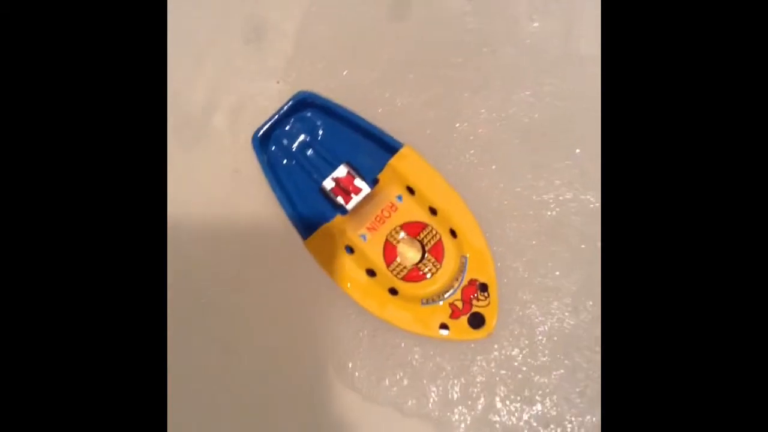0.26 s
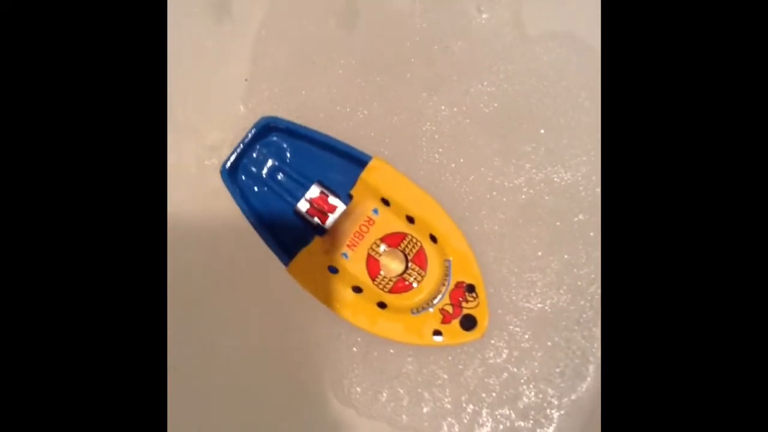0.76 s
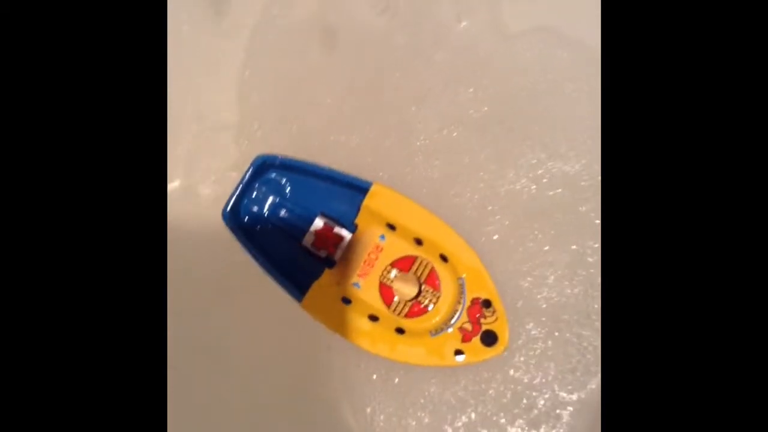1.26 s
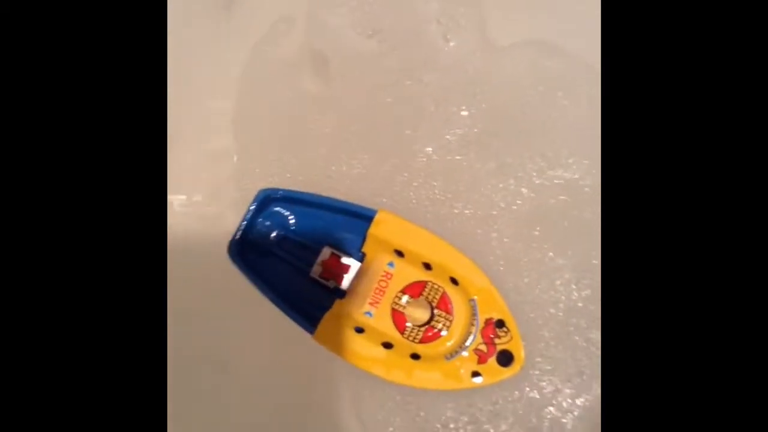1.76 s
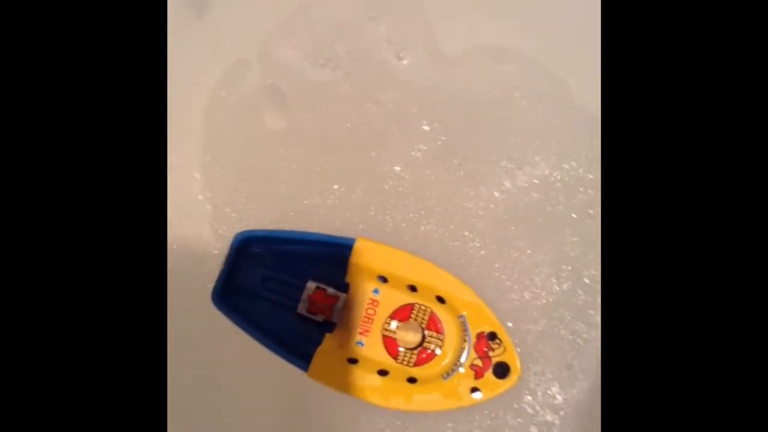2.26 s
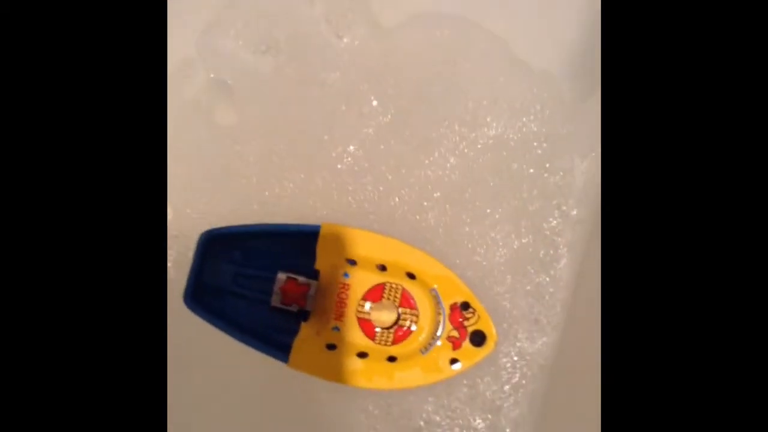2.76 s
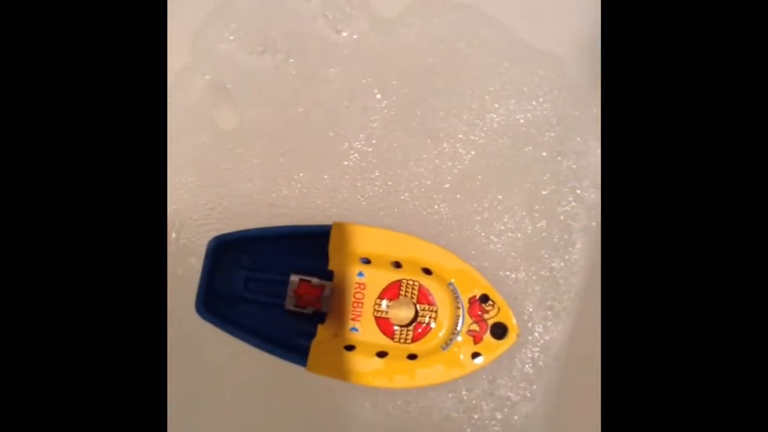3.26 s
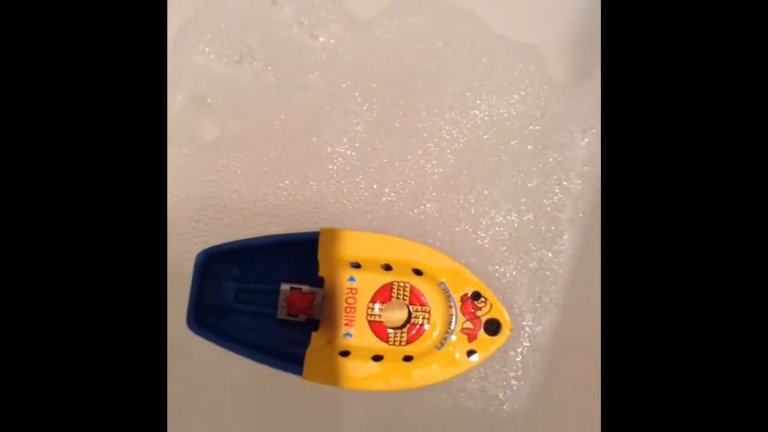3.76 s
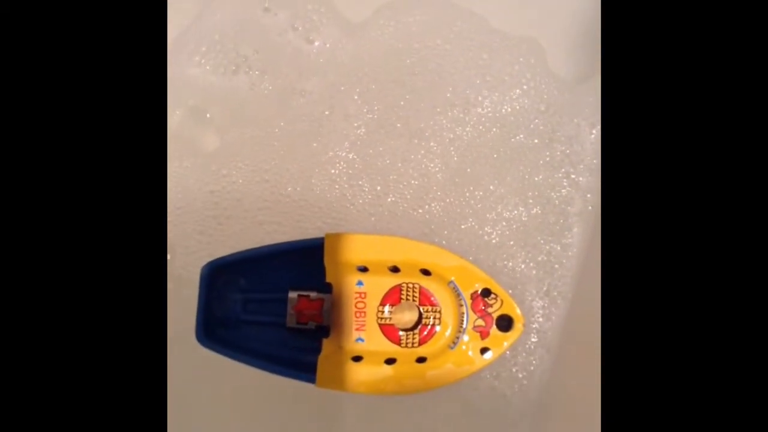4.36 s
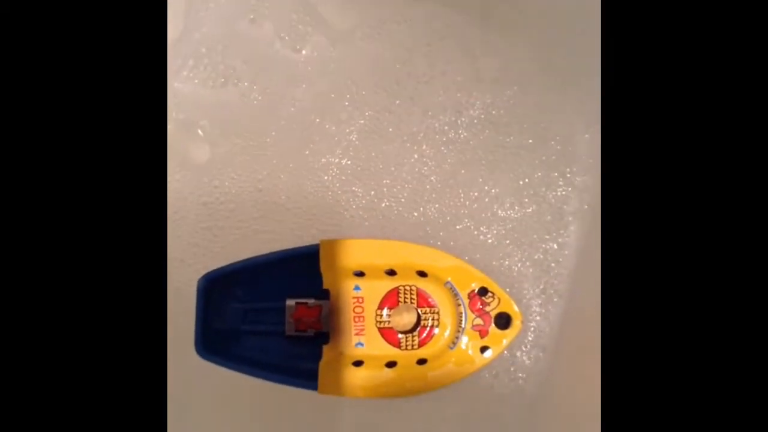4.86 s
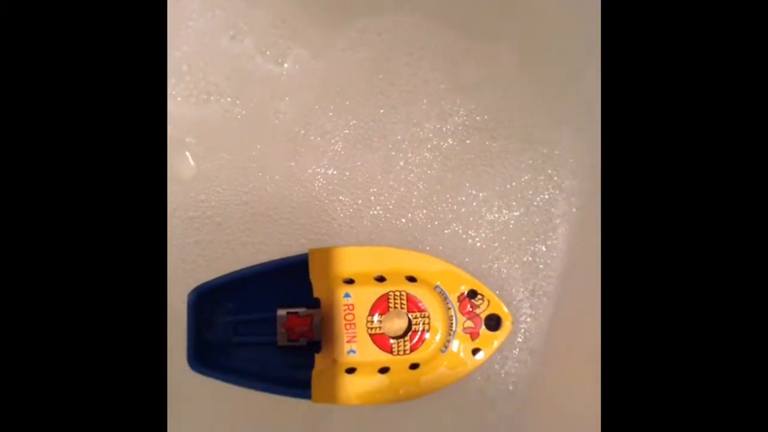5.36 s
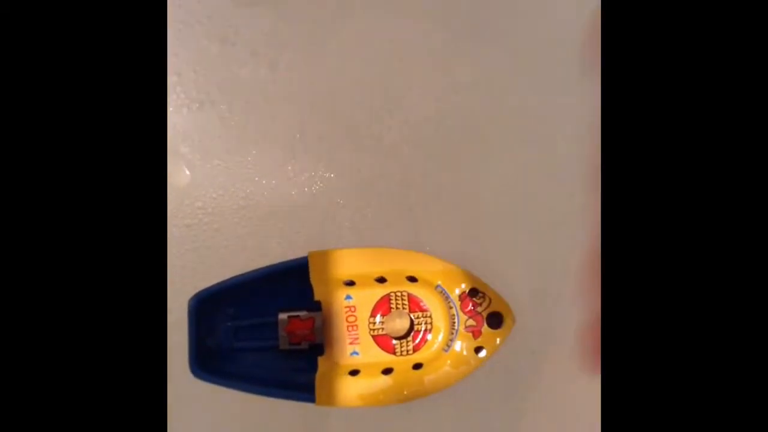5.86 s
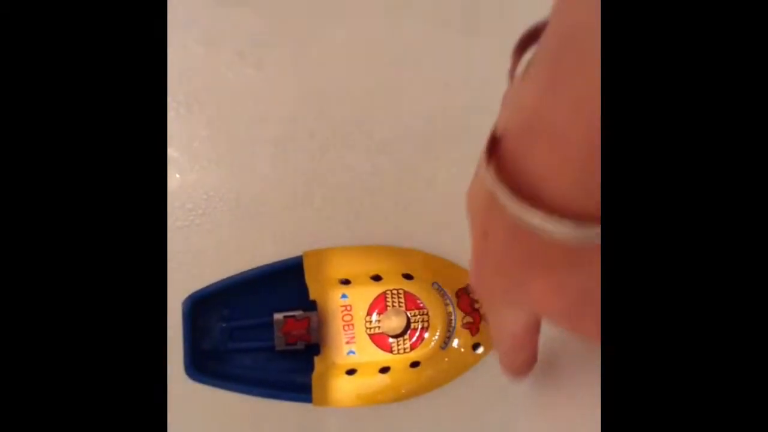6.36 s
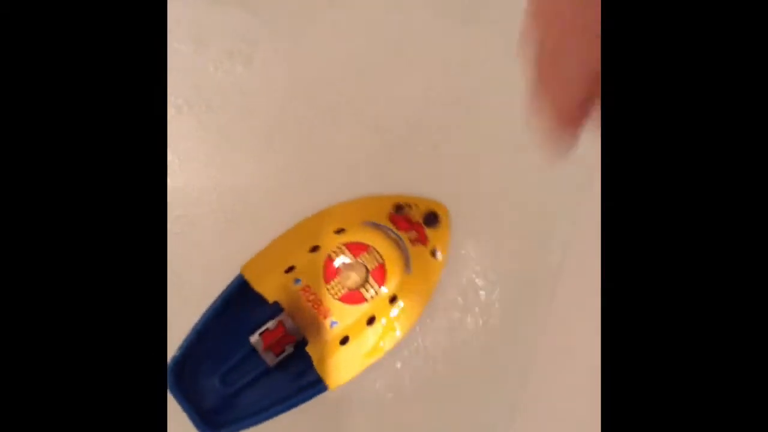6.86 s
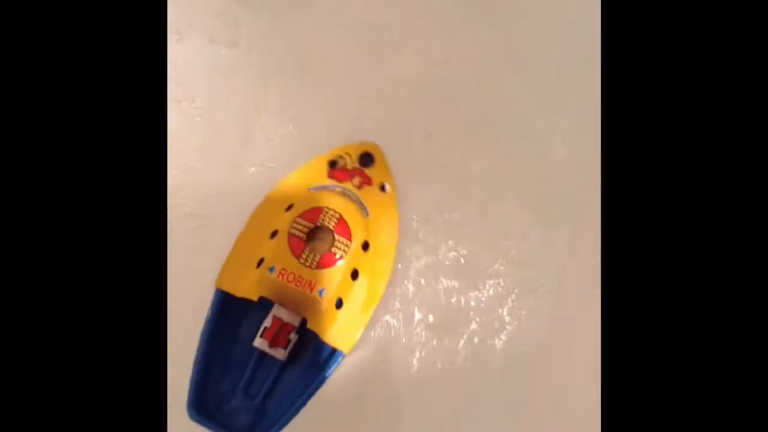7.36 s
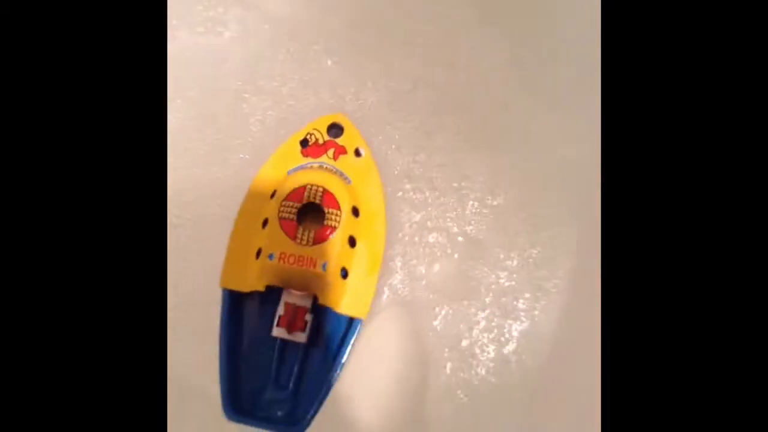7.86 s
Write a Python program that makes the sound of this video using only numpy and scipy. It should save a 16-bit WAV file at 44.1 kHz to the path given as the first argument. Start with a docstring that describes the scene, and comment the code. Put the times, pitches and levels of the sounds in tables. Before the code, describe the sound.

Close phone pickup of a toy steam boat's tinny, rapid tick-tack running nonstop for eight seconds. At first soft flexes mix with sharp, crackling lid snaps and a hollow little thump at each push. After about four seconds the same even pace continues with weaker, rounder clicks. The tub rings slightly, and a short bright bathroom echo surrounds it over faint room noise.

```python
"""Steam toy boat in a bath tub

A candle-heated tin toy boat runs in a bath tub, close under a phone. Eighteen times a second steam pushes the thin
boiler lid out and suction pulls it back: a soft flex or a hard snap, made of decaying hull and lid modes and noise.
From 3.9 s on the engine runs calmer and duller. A low sine thumps at each steam push. The tub answers with slowly
dying modes, the tiled room with a tail of decaying noise, over a faint coloured room noise."""
import sys
import numpy as np
from scipy import signal
from scipy.fft import rfft, irfft, next_fast_len
from scipy.io import wavfile

SR = 44100
rng = np.random.default_rng(int(sys.argv[2]) if len(sys.argv) > 2 else 0)


def to_wav(sig):
    """Store sig (one row per channel, or 1-D mono) as 16-bit WAV at the path in sys.argv[1].

    Samples outside -1..1 are clipped; the rate is SR.
    """
    pcm = np.clip(np.atleast_2d(sig), -1, 1) * 32767
    pcm = np.round(pcm).astype(np.int16)
    wavfile.write(sys.argv[1], SR, pcm.T)  # frames by channels


def field_ratio(decibels):
    """Amplitude ratio for a level in dB (20 dB per decade); scalars and array-likes work."""
    return 10 ** (np.asarray(decibels, dtype=float) / 20)


N = 357210
CALM_S = 3.9  # the engine is lively up to here, calm afterwards; pairs of settings are (lively, calm)


def unit(x):
    """Normalisation: scales a signal to rms 1."""
    return x / np.sqrt(np.mean(x ** 2) + 1e-20)


def along(points, hz):
    """Logarithmic interpolation: reads (Hz, value) points on a log frequency axis."""
    point_hz, value = np.transpose(points)
    return np.interp(np.log(hz + 1), np.log(point_hz + 1), value)


def noise(spectrum, size):
    """Spectral shaping: white noise weighted in frequency, at rms 1."""
    m = next_fast_len(size + 8192)
    white = rfft(rng.standard_normal(m))
    gain = field_ratio(along(spectrum, np.fft.rfftfreq(m, 1 / SR)))
    return unit(irfft(white * gain, m)[:size])


def cut(x, hz, order, kind):
    """Linear filtering: a Butterworth high- or low-pass."""
    return signal.sosfilt(signal.butter(order, hz, kind, fs=SR, output="sos"), x)


# spectrum shape of the steady room noise: pitch_hz [Hz], relative level_db [dB per Hz]
AIR_SPECTRUM = [(20, -45), (60, -38), (100, -29), (180, -3.5), (400, -6), (900, -1.5), (2500, -6),
                (6500, -21), (14500, -31), (16500, -47)]
# room modes that colour the room noise: pitch_hz [Hz], width_hz [Hz], level_db [dB]
ROOM_MODES = [(104.5, 14, -78), (123, 18, -77.5), (178.2, 20, -71.5), (283, 13.4, -64), (338, 17, -63),
              (433.5, 30, -62.5), (677, 7.9, -65.5)]


def air():
    """Room resonance: faint broadband noise, stronger in narrow bands at the room's modes."""
    out = field_ratio(-50.5) * noise(AIR_SPECTRUM, size=N)
    for hz, width, db in ROOM_MODES:
        band = [(hz - 3 * width, -40), (hz - width / 2, -3), (hz, 0), (hz + width / 2, -3), (hz + 3 * width, -40)]
        out = out + field_ratio(db) * noise(band, size=N)
    return out


# decay of the room: pitch_hz [Hz], t60_s [s]
ROOM_T60 = [(300, 0.39), (2000, 0.31), (5500, 0.28), (14000, 0.26)]
# colour of the room: pitch_hz [Hz], relative level_db [dB]
ROOM_COLOUR = [(300, -1.5), (1000, -1.5), (2500, 0.8), (6000, -3), (14000, 1.27)]


def room(x, count=28):
    """Diffuse reverberation: decaying noise, each frequency at its own speed, follows the sound."""
    out, gap = np.zeros(N + SR), round(.004 * SR)  # the tail starts 4 ms late
    edges = np.linspace(0, N, count + 1).astype(int)
    # every stretch of sound gets a tail of its own, as boat and phone drift
    for a, b in zip(edges, edges[1:]):
        hz, t, z = signal.stft(rng.standard_normal(SR // 2), SR, nperseg=256)
        decay_db = -60 * t / along(ROOM_T60, hz)[:, None]
        shape = field_ratio(along(ROOM_COLOUR, hz)[:, None] + decay_db)
        tail = signal.istft(z * shape, SR, nperseg=256)[1]
        wet = signal.fftconvolve(x[a:b], tail / np.linalg.norm(tail))
        out[a + gap:][:len(wet)] += wet
    return out[:N]


# ringing modes of the tub shell: pitch_hz [Hz], relative level_db [dB], t60_s [s]
SHELL = [(681.3, 19, 0.13), (852, 16, 0.14), (1010, -19, .2), (1426, 15, 0.13), (1820, 13, 0.09),
         (1870, 10.5, 0.27), (2040, -30, 0.17), (2220, -27, .2), (2480, -13, 0.6), (3090, 0, 0.26),
         (3880, 8, 0.63), (5000, -18, 0.11), (5700, -26, 0.13)]


def shell(x):
    """Sympathetic resonance: the tub shell takes up sound near its modes and lets it die slowly."""
    t = np.arange(SR // 2) / SR
    tail = sum(field_ratio(db - 60 * t / t60) * np.sin(2 * np.pi * hz * t) for hz, db, t60 in SHELL)
    return signal.fftconvolve(x, tail)[:N]


def hardness(s, hull_db, lid_db):
    """Snap-through buckling: 0 for a soft flex, 1 for a hard snap, by how loud the lid is against the hull."""
    middle_db = (-11, -17)[int(s > CALM_S)]  # lid over hull at which a flex turns into a snap, dB
    return 1 / (1 + np.exp(middle_db + hull_db - lid_db))


# hollow thump of the steam push, rows lively and calm:
# pitch_hz [Hz], level_db at half of CALM_S [dB], t60_s [s]
THUMP = [(485.5, -30.5, 0.035), (405, -40, 0.029)]


def thump(pushes, lead):
    """Pressure pulse: steam pressure builds before the lid moves, earlier when it then snaps."""
    out, t = np.zeros(N + SR), np.arange(SR // 10) / SR
    for s, hull_db, lid_db in pushes:
        calm = int(s > CALM_S)
        hz, db, t60 = THUMP[calm]
        hz_slip, db_slip = rng.standard_normal(2)
        # the thump weakens with time, dB per s
        weaker_db = (-0.3, -0.22)[calm] * (s - CALM_S / 2)
        fade = field_ratio(db + weaker_db + 1.34 * db_slip - 60 * t / t60) * (1 - np.exp(-t / 0.0017))
        at = round((s - lead * hardness(s, hull_db, lid_db)) * SR)
        out[at:][:len(t)] += fade * np.sin(2 * np.pi * hz * (1 + 0.023 * hz_slip) * t)
    return out[:N]


# cycles in which the lid snaps: push start_s [s], wait_s until the return [s],
# push hull level_db [dB], push lid level_db [dB], return lid level_db [dB]
SNAPS = [(0.0138, 0.012, -26, -31, -25), (0.2305, 0.012, -25.5, -30.5, -25),
         (0.5534, 0.013, -25.5, -31.5, -25.5), (0.7732, .011, -25, -31, -24.5),
         (.935, .0146, -23.5, -32.5, -25.5), (1.0473, 0.013, -23.5, -31, -25.5),
         (1.157, 0.012, -23, -32.5, -25.5), (1.2663, .0131, -24.5, -32.5, -24),
         (1.3754, .0149, -23.5, -29.5, -25), (1.486, .0162, -25, -31.5, -26),
         (1.5447, 0.013, -24, -31, -25.5), (1.654, .0151, -24.5, -28, -25),
         (1.7134, 0.013, -23.5, -27.5, -24), (1.8233, 0.013, -26.5, -30, -22.5),
         (1.9327, 0.015, -24, -27.5, -24), (2.0457, 0.012, -23.5, -28, -24), (2.154, 0.013, -24, -30, -23),
         (2.2646, 0.012, -23.5, -29.5, -24), (2.3689, 0.017, -23, -28.5, -23.5),
         (2.425, 0.019, -25.5, -29, -23.5), (2.4835, .0175, -23.5, -32.5, -21.5),
         (2.5464, 0.0099, -25.5, -29, -23), (2.707, 0.014, -22.5, -27, -21.5),
         (2.7655, 0.011, -23, -35.5, -23), (2.8728, 0.016, -23, -29, -23),
         (2.9313, .0144, -24.5, -28.5, -21.5), (3.0427, 0.016, -23, -30, -23.5),
         (3.154, 0.015, -24.5, -29, -22), (3.2646, 0.012, -26.5, -34, -22.5),
         (3.3707, .0148, -26, -30.5, -22.5), (3.427, 0.014, -27.5, -33, -22.5),
         (3.483, 0.014, -25, -28.5, -21.5), (3.5416, 0.011, -24.5, -33.5, -22.5),
         (3.6457, 0.017, -24.5, -31, -22.5), (3.7038, .0141, -26, -35.5, -23),
         (3.7591, 0.013, -25.5, -33.5, -24), (3.8634, .0175, -19.5, -25.5, -24),
         (4.0844, .0127, -31.5, -31, -28.5), (4.2553, 0.0076, -29.5, -39, -32.5),
         (4.3633, 0.012, -29, -35.5, -33), (4.478, 0.007, -30, -42, -38.5),
         (4.5892, 0.0086, -29.5, -39.5, -42.5), (4.8662, .0086, -35, -36.5, -38.5),
         (4.9773, 0.01, -32.5, -40, -34.5), (5.09, 0.009, -28.5, -46, -39),
         (5.147, 0.007, -34, -39.5, -45.5), (5.3133, .0086, -34, -39, -34.5),
         (5.4787, 0.0088, -33, -36, -39.5), (5.644, .0094, -33, -36, -40.5),
         (5.701, 0.0092, -31, -38.5, -36), (5.867, 0.0073, -31.5, -45, -46.5),
         (6.035, 0.0078, -34, -41, -39), (6.0913, 0.0084, -34, -45, -41), (6.1463, 0.0088, -33, -44, -46),
         (6.2037, 0.0073, -34, -38.5, -61), (6.2605, 0.0072, -32, -40.5, -58),
         (6.3171, 0.0074, -33.5, -46, -62), (6.427, 0.0096, -32, -36.5, -35.5),
         (6.5407, 0.0097, -32.5, -37.5, -41.5), (6.7116, .0047, -36, -46, -54),
         (6.8186, 0.0088, -30, -43.5, -48), (6.9304, 0.0097, -31.5, -39, -34.5),
         (7.0417, .0122, -31, -39, -33.5), (7.1558, 0.0079, -31, -45.5, -49.5),
         (7.2121, 0.0097, -29.5, -39, -34), (7.377, 0.0097, -30, -41, -39.5),
         (7.4328, .0098, -31, -43.5, -56), (7.5465, 0.0092, -29, -41, -39), (7.6596, 0.0065, -34, -48, -59),
         (7.716, 0.0087, -30.5, -42.5, -42.5), (7.826, 0.011, -30, -41, -38),
         (7.9914, 0.011, -30.5, -44, -36)]
# hull level of the soft flexes over time: start_s [s], push level_db [dB], return level_db [dB]
FLEX = [(0, -35.5, -28.5), (.9, -34.5, -27), (1.4, -30.5, -27), (1.8, -36, -27.5), (2.2, -31.5, -26.5),
        (2.8, -32, -26), (3.1, -36, -26), (3.6, -47, -27), (3.87, -42, -28.5), (3.92, -29.5, -31.5),
        (4.15, -38, -29), (4.7, -42, -28.5), (5, -35, -28), (5.3, -41, -28), (6, -36, -28.5),
        (6.65, -40, -28.5), (7, -36.5, -30.5), (7.3, -41, -32), (8.1, -41, -32)]
# place of a snapping cycle on the beat, rows lively and calm: share of its wait [ratio], shift_s [s]
BEAT = [(1, -.003), (0.2013, .0075)]


def cycles():
    """Relaxation oscillation: rows (s, hull dB, lid dB) of pushes and returns, soft flexes between the snaps."""
    cycle_s, flex_wait_s = .0555, .013  # beat; soft push to soft return
    flex_lid_db = (-25, -21.5)  # lid over hull in a soft flex, push and return: it hardly rings
    # scatter of push and return: time in s, hull in dB, lid in dB
    scatter = [(0.00081, .0004), (1.5, 0.3), (2, 1.5)]
    s, wait, push_hull, push_lid, back_lid = np.transpose(SNAPS)
    share, shift = np.array(BEAT)[(s > CALM_S).astype(int)].T
    beat = s + share * wait + shift
    ends = np.append(beat[1:], beat[-1] + 2 * cycle_s)
    # soft flexes fill the beat evenly between the snaps
    fills = [np.linspace(a, b, round((b - a) / cycle_s) + 1)[1:-1] for a, b in zip(beat, ends)]
    soft = np.concatenate(fills)
    chance = rng.standard_normal((len(soft), 3, 2)) * scatter
    times, *flex_db = np.transpose(FLEX)
    rows = []
    for k, early in enumerate((flex_wait_s, 0)):
        late, hull, lid = chance[:, :, k].T
        hull = hull + np.interp(soft, times, flex_db[k])
        rows.append(np.transpose([soft - early + late, hull, hull + flex_lid_db[k] + lid]))
    # a snapping return hits the hull harder, the more the louder the lid; never over 1 dB below a soft one
    harder_db = np.maximum(0.3992 * (back_lid + 42), -1)
    back_hull = np.interp(s, times, flex_db[1]) + harder_db
    pushes = np.vstack([np.transpose([s, push_hull, push_lid]), rows[0]])
    returns = np.vstack([np.transpose([s + wait, back_hull, back_lid]), rows[1]])
    return pushes, returns


# as the boat turns, its parts face the phone more or less: start_s [s], then relative level_db [dB] of the
# bilge, cabin, deck and lid centre modes
FACING = [(0, 1, 3, 6, -3.5), (1.2, 0, 1.5, 2, -3.5), (2.4, 0, 0, 0.5, -2), (3.8, 1, 0.5, 1.5, 4.5),
          (4.1, -1.5, -0.5, 0, -4), (5.5, -0.5, -0.5, -1.5, -1.5), (6.6, 0.5, -3, -2, -1.5),
          (7.2, 2, -5.5, -1, -3), (8.1, 4.5, -4, 5, -4)]
# modes of the bilge, cabin, deck and lid centre: from_hz [Hz], to_hz [Hz]
PARTS = [(600, 1000), (2000, 3100), (3100, 4000), (5000, 6000)]


def facing_db(s, hz):
    """Directivity: the heading of the boat shifts the balance among its modes."""
    times, *parts = np.transpose(FACING)
    return sum(np.interp(s, times, db) * ((hz > lo) & (hz < hi)) for db, (lo, hi) in zip(parts, PARTS))


def ring(hz, t60, db, t, rise, hold, scatter_db, slip):
    """Modal decay: modes hold while the lid still moves, then die, varied at each blow; rms 1 over 6 ms."""
    chance = rng.standard_normal((2, len(hz), 1))
    # age stays near 0 during the hold, then runs 1.51 times as fast as the clock
    age = 1.51 * (np.sqrt(t ** 2 + hold ** 2) - hold)
    decay = field_ratio(db[:, None] + scatter_db * chance[0] - 60 * age / t60[:, None])
    fade = decay * (1 - np.exp(-t / rise))
    x = (fade * np.sin(2 * np.pi * hz[:, None] * t + slip * chance[1])).sum(axis=0)
    return x / np.sqrt(np.mean(x[t < .006] ** 2))


# spectrum shape of the crack of a snap, lively: pitch_hz [Hz], relative level_db [dB per Hz]
CRACK_LIVELY = [(2500, -15.5), (4000, -0.5), (6000, -5.5), (9000, -3), (12000, -10.5), (15000, -11),
                (17000, -42)]
# the same, calm
CRACK_CALM = [(2500, -45), (4000, 5.5), (6000, 1), (9000, -6.5), (12000, -13), (15000, -22)]
# hull modes: pitch_hz [Hz], t60_s [s, of the age in ring()], then relative level_db [dB] for the push:
# lively soft, lively hard, calm soft, calm hard; the same four for the return
HULL = [(660, 0.022, -23, -23, -35, -35, -35, -35, -17, -14),
        (830, 0.018, -23, -18, -14, -14, -18, -35, -12, -7),
        (1090, 0.027, -35, -35, -35, -35, -29, -35, -8, -13),
        (1190, 0.027, -12, -25, -5, -24, -3, -21, 0, -1), (1300, 0.027, -10, 0, -3, 0, -4, -4, -8, -3),
        (1465, 0.027, -35, -6, -13, -7, -35, -35, -11, -6),
        (1570, 0.027, -9, -12, -2, -12, -13, -11, -10, 0), (1670, 0.027, 0, -1, 0, -13, -4, 0, -7, -17),
        (1860, 0.027, -6, -2, -3, -13, -4, -4, -7, -4), (2070, 0.027, -7, -8, -9, -14, -4, -5, -5, -7),
        (2180, 0.027, -6, -17, -35, -35, 0, -4, -35, -35),
        (2490, 0.027, -9, -7, -13, -18, -4, -7, -15, -11),
        (2960, 0.027, -16, -4, -17, -20, -13, -9, -17, -12),
        (3250, 0.027, -18, -13, -17, -19, -14, -15, -12, -13),
        (3510, 0.027, -18, -16, -16, -14, -18, -13, -17, -14)]
# lid modes: pitch_hz [Hz], t60_s [s, of the age in ring()], then relative level_db [dB]:
# push lively, push calm, return lively, return calm
LID = [(3884, 0.026, -20, -11, -13.5, -7), (4437, 0.019, -4, -10, -10.5, -13.5),
       (4856, 0.022, -8.5, -14, -7.5, -15), (5118, 0.018, -6, -8, -4.5, -4.5),
       (5320, 0.022, -10, -5, -4.5, 1.5), (5562, 0.019, 1, 3.5, -3, -10), (5843, 0.016, -6, -4, 1.5, -2.5),
       (6410, 0.025, -11.5, -23, -11.5, -15.5), (6935, 0.027, -14, -26, -11.5, -20),
       (7224, 0.025, -18, -33, -12, -23), (7770, 0.031, -15, -32, -16.5, -21.5),
       (8120, 0.027, -18, -37, -11, -20), (8510, 0.023, -14, -30, -17.5, -24),
       (9030, 0.03, -22, -36, -20, -24)]


def strokes(rows, hull_db, lid_db, flex_rise, flex_slip, rattle, crack_db, crack_t60, swell_db, lead):
    """Impact excitation: each stroke rings hull and lid; a lid louder against the hull means a harder blow."""
    out, t = np.zeros(N + SR), np.arange(SR // 10) / SR
    hull_hz, hull_t60 = np.transpose(HULL)[:2]
    lid_hz, lid_t60 = np.transpose(LID)[:2]
    hiss = noise(CRACK_LIVELY, size=N + SR), noise(CRACK_CALM, size=N + SR)
    for s, body_db, snap_db in rows:
        calm, at = int(s > CALM_S), round(s * SR)
        hard = hardness(s, body_db, snap_db)
        # a soft flex wakes the higher modes later, so the pop seems to sweep upward
        soft_rise = flex_rise[calm] * (hull_hz[:, None] / 1200) ** 1.74
        rise = hard * 0.00041 + (1 - hard) * soft_rise
        hold = 0.003 + hard * rattle[calm]  # a hard snap holds up to some milliseconds longer
        soft_db, hard_db = hull_db[2 * calm:][:2] + facing_db(s, hull_hz)
        mode_db = soft_db + hard * (hard_db - soft_db)
        body = ring(hull_hz, hull_t60, mode_db, t, rise, hold,
                    scatter_db=0.98 + 1.1 * hard, slip=flex_slip + 0.49 * hard)
        snap = ring(lid_hz, lid_t60, lid_db[calm] + facing_db(s, lid_hz), t, 0.00067, hold,
                    scatter_db=3.5, slip=2.6)
        # a hard lively snap adds a shorter burst to the crack
        short_burst = 0.53 * hard * (1 - calm) * field_ratio(-60 * t / 0.015)
        burst = (field_ratio(-60 * t / crack_t60[calm]) + short_burst) * (1 - np.exp(-t / 0.0008))
        crack = field_ratio(crack_db[calm]) * burst * hiss[calm][at:][:len(t)]
        out[at:][:len(t)] += field_ratio(body_db) * body + field_ratio(snap_db) * (snap + crack)
        # before it snaps through, the lid first flexes softly
        swell = ring(hull_hz, hull_t60, soft_db, t, rise=.002, hold=.002, scatter_db=2.5, slip=.6)
        out[at - round(lead * SR):][:len(t)] += hard * field_ratio(swell_db[calm]) * swell
    return out[:N]


def boiler(pushes, returns):
    """Modal excitation: push and return strike the same modes at different strengths."""
    hull_db, lid_db = np.transpose(HULL)[2:], np.transpose(LID)[2:]
    # rise, rattle, crack_t60 and lead in s; slip in rad
    push = strokes(pushes, hull_db[:4], lid_db[:2], flex_rise=(.0015, .0005), flex_slip=0.53,
                   rattle=(.0005, .0015), crack_db=(-3.5, -12), crack_t60=(.025, .03),
                   swell_db=(-37, -37), lead=.005)
    back = strokes(returns, hull_db[4:], lid_db[2:], flex_rise=(.0005, .001), flex_slip=0.27,
                   rattle=(.0015, .005), crack_db=(-1.5, -6.5), crack_t60=(.04, .06),
                   swell_db=(-37, -42), lead=0.001407)
    return push + back


def scene():
    """Superposition: boat, tub, room and room noise add up; the thin tin radiates no bass."""
    pushes, returns = cycles()
    tin = cut(boiler(pushes, returns), hz=568, order=3, kind="high")
    boat = tin + thump(pushes, lead=0.00491)
    tub = field_ratio(-68.5) * shell(boat)
    reverb = field_ratio(-7) * room(boat)
    return (boat + tub + reverb + air())[None]


def low_pass(x):
    """Removes everything above the highest recorded frequency."""
    return signal.sosfilt(signal.butter(12, 16460, fs=SR, output="sos"), x)


def record(dry):
    """Band limiting: the phone cuts the top treble."""
    mix = cut(dry, hz=15600, order=12, kind="low")
    return low_pass(mix)


dry = scene()
out = record(dry)
to_wav(out)
```